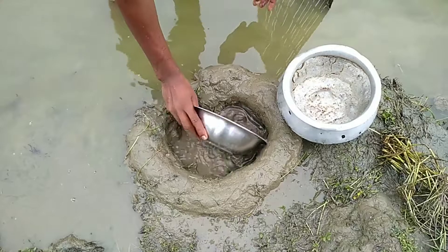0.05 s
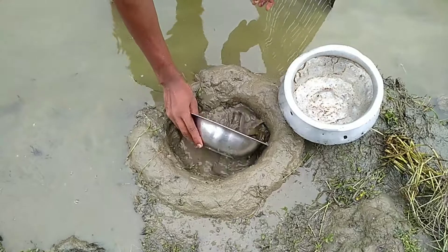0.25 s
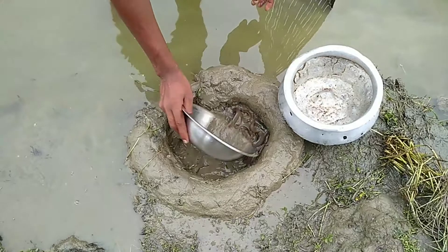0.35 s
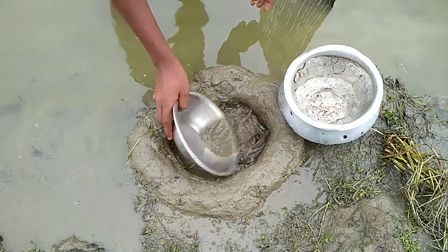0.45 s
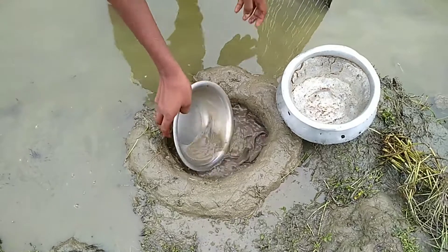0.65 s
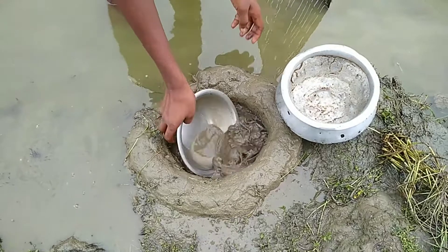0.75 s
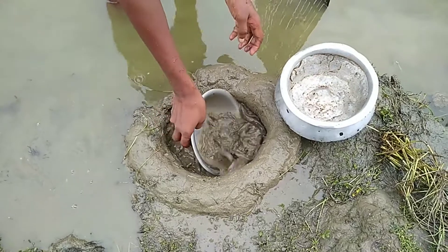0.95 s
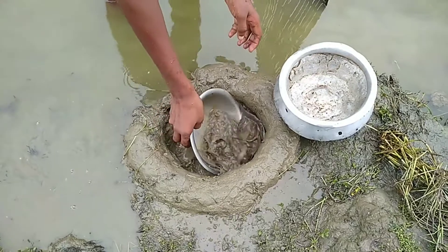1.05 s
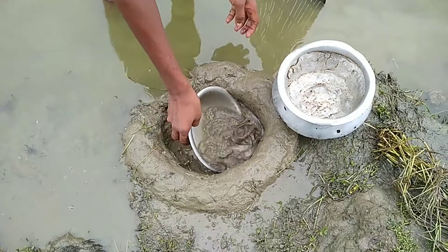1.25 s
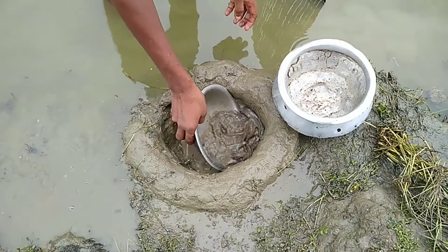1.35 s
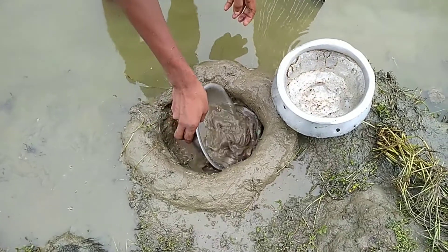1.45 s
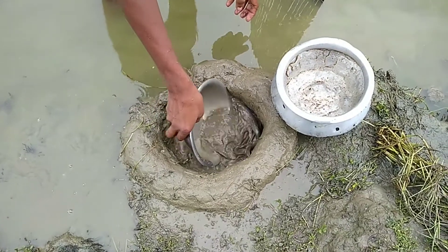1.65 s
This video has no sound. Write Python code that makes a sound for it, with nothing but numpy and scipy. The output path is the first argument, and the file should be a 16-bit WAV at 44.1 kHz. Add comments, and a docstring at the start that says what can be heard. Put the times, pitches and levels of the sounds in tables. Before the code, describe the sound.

A bowl scoops muddy water with wet splashes, spatter and bubbles, over light wind rumble and hiss

```python
"""After a short silence, wind rumbles in two microphone ports, over a faint river and a narrow, high hiss.
A steel bowl is tipped into a pit of muddy water: it splashes in, the water slops, spatters and bubbles.
Wind is low noise and wobbling tones; water is showers of clicks and damped tones; hiss is grainy noise.
The left port is bright and rings in the treble; the right one is muffled."""
import sys
import numpy as np
from scipy import signal
from scipy.fft import rfft, irfft
from scipy.io import wavfile
from scipy.ndimage import uniform_filter1d

SR = 44100
rng = np.random.default_rng(int(sys.argv[2]) if len(sys.argv) > 2 else 0)


def generate_wav(sig):
    """Save sig (samples, or channels by samples) to the path in sys.argv[1] as 16-bit PCM at SR."""
    pcm = np.round(np.clip(np.atleast_2d(sig).T, -1, 1) * 32767).astype(np.int16)
    wavfile.write(sys.argv[1], SR, pcm)


N = 74970


def undb(db):
    """Turn decibels into a gain."""
    return 10 ** (np.asarray(db) / 20)


def unit(x):
    """Scale to an average (rms) level of 1."""
    return x / np.sqrt(np.mean(x ** 2) + 1e-18)


def curve(rows, column=1):
    """Draw straight lines in dB between the table's points and return a gain for every sample."""
    rows = np.array(rows)
    return undb(np.interp(np.arange(N) / SR, rows[:, 0], rows[:, column]))


def colour(x, points):
    """Filter to the given (frequency [Hz], level [dB]) response without any sound before the input."""
    size = 2 * N
    hz, db = np.array(points).T
    log_hz = np.log(np.fft.rfftfreq(size, 1 / SR) + 1)
    gain = undb(np.interp(log_hz, np.log(hz), db))
    # Folding the cepstrum onto positive times gives the filter with the least delay.
    cepstrum = irfft(np.log(gain))
    cepstrum[1:N] *= 2
    cepstrum[N + 1:] = 0
    response = np.exp(rfft(cepstrum))
    return irfft(rfft(x, size) * response)[:N]


def steady(x, span_s):
    """Even out the loudness: hold the rms near 1 over spans of this length."""
    power = np.abs(uniform_filter1d(x ** 2, max(int(span_s * SR), 2)))
    return x / np.sqrt(power + 1e-3 * np.mean(x ** 2))


def noise(points):
    """Coloured noise of rms 1."""
    return unit(colour(rng.standard_normal(N), points))


def crackle(points, rate, scatter_db):
    """Many coloured clicks at random times, rate per second, of either sign and random size; rms 1."""
    sizes = undb(scatter_db * np.clip(rng.standard_normal(N), -2, 2))
    signs = rng.choice([-1, 1], N)
    present = rng.random(N) < rate / SR
    return unit(colour(sizes * signs * present, points))


def burst(start, attack, hold, decay):
    """A level that climbs in a straight line, holds, then dies away exponentially; all in seconds."""
    age = np.arange(N) / SR - start
    return np.clip(age / attack, 0, 1) * np.exp(-np.maximum(age - hold, 0) / decay)


# Wind buffets, one list for the left port and one for the right:
# (centre time [s], length [s], tone level [dB], pitch [Hz], flutter level [dB])
WIND_BUFFETS = [
    [(.153, 0.015, -32.5, 119.1, -39), (.19, 0.015, -38, 220, -46), (.218, 0.0057, -39.5, 300, -36),
     (.227, 0.016, -24, 75, -32), (.3, 0.036, -44.5, 54.3, -66), (.495, 0.044, -50, 130, -41),
     (.85, 0.055, -42, 80, -46), (.965, 0.028, -44, 90, -45.5), (1.128, 0.011, -37.5, 220.6, -38),
     (1.233, 0.0067, -36.5, 169.6, -40), (1.278, 0.01, -39, 91.8, -26), (1.307, 0.019, -28.5, 80.2, -39),
     (1.412, 0.015, -30, 99.97, -28), (1.46, 0.04, -56, 79.3, -39), (1.544, 0.02, -45.5, 91.6, -35),
     (1.6, 0.0058, -38, 200, -34.5), (1.65, 0.026, -44.5, 91.6, -49)],
    [(.09, 0.13, -53.5, 91.3, -45.5), (.42, 0.024, -30, 75.04, -35), (.465, 0.012, -29.5, 65.24, -38.5),
     (.524, 0.03, -26.5, 61.64, -49), (.575, 0.014, -35.5, 65, -39), (.645, 0.039, -30.5, 70.4, -43.5),
     (.703, 0.034, -32, 72, -29), (.75, 0.037, -36.5, 80, -36.5), (.79, 0.031, -30, 70, -34),
     (.917, 0.014, -31, 65, -37), (1.19, 0.014, -26, 60, -42), (1.237, 0.014, -29.5, 60, -37.5),
     (1.388, 0.024, -40.5, 96.5, -44.5)],
]
# Steady wind: (time [s], left level [dB], right level [dB])
STEADY_WIND = [(0, -86, -39), (.25, -52.5, -56.5), (.4, -68, -46.5), (.75, -63.5, -44.5), (.9, -60, -43.5),
               (1.08, -61, -47), (1.35, -62, -48.5), (1.7, -54, -57.5)]
# Colour of the wind noise: (frequency [Hz], level [dB])
RUMBLE_COLOUR = [(20, -24.5), (35, -13), (65, 1), (110, -3.5), (200, -11.5), (320, -19.5), (500, -36.5),
                 (800, -59.5), (2000, -70)]
BUFFET_WOBBLE = 0.19  # rms pitch wander, as a share of the pitch


def wind(buffets, bed):
    """Wind on one port: a low rumble, and eddies that each push it for a cycle or two and flutter."""
    t = np.arange(N) / SR
    flutter = steady(noise(RUMBLE_COLOUR), 0.0372)
    wobble = noise(RUMBLE_COLOUR)
    out = bed * steady(noise(RUMBLE_COLOUR), 0.044)
    for centre, length, db, hz, flutter_db in buffets:
        phase = hz * np.cumsum(1 + BUFFET_WOBBLE * wobble) / SR + rng.random()
        push = undb(db) * np.sqrt(2) * np.sin(2 * np.pi * phase)
        swell = np.exp(-2 * ((t - centre) / length) ** 2)
        out = out + swell * (push + undb(flutter_db) * flutter)
    return out


# Colour of the river: (frequency [Hz], level [dB])
RIVER_COLOUR = [(100, 23.5), (700, -2), (1300, 0), (3000, -10), (6000, -6), (15000, -31)]


def river():
    """The river's murmur on one port: quiet, steady noise, strongest in the bass."""
    return undb(-69.5) * noise(RIVER_COLOUR)


PATCHY_DB, PATCHY_PER_S = 5.5, 110  # rms size of the wander; inverse of its smoothing time


def patchy():
    """A gain that wanders quickly at random: smoothed noise read as decibels."""
    k = int(SR / PATCHY_PER_S)
    smooth = uniform_filter1d(rng.standard_normal(N), k)
    smooth = uniform_filter1d(smooth, k // 3 + 1)
    return undb(PATCHY_DB * unit(smooth))


# In cycles: time to fall to 1/e, time to swell. Glide: share the pitch rises per decay time.
BUBBLE_CYCLES, BUBBLE_RISE_CYCLES, BUBBLE_GLIDE = 5.8, 1.98, 0.027


def add_bubble(out, start, hz, db):
    """Add one bubble: a damped tone that swells in a few cycles and rises in pitch."""
    first = int(np.clip(start * SR, 0, N - 1))
    length = min(N - first, int(10 * BUBBLE_CYCLES * SR / hz))
    cycles = np.arange(length) * hz / SR
    swell = 1 - np.exp(-(cycles / BUBBLE_RISE_CYCLES) ** 2)
    shape = 2 * swell * np.exp(-cycles / BUBBLE_CYCLES)
    phase = cycles * (1 + .5 * BUBBLE_GLIDE * cycles / BUBBLE_CYCLES) + rng.random()
    out[first:first + length] += undb(db) * shape * np.sin(2 * np.pi * phase)


def swarm(rate, low_hz, high_hz):
    """Bubbles of random time, size and pitch, evened out to an rms near 1."""
    out = np.zeros(N)
    for when, pitch, size in rng.random((int(rate * N / SR), 3)):
        hz = low_hz * (high_hz / low_hz) ** pitch
        db = 8 * min(-np.log(size), 2)  # many small bubbles, few large ones
        add_bubble(out, when * N / SR, hz, db)
    return steady(out, 0.084)


# Sloshing: (time [s], churning level [dB], fine spray level [dB])
SLOSH_LEVELS = [(0, -33.5, -28), (.64, -37, -23.5), (.69, -30.5, -31), (.77, -23, -20), (.795, 4, 8),
                (.85, -9.5, -9), (.93, 2, 4.5), (.98, -5.5, -20), (1.03, -1.5, -8), (1.07, -9.5, -19.5),
                (1.17, -5, 3.5), (1.25, -8, -22), (1.345, -18, -20), (1.39, -9, -11), (1.5, -15, -26),
                (1.58, -17.5, -18), (1.66, -12.5, -14.5), (1.7, -28.5, -28)]
# Colours of the water's low body, its ring and its bright spray: (frequency [Hz], level [dB])
BODY_COLOUR = [(200, -18.5), (550, -12), (800, -10.5), (1250, 4), (1800, -7), (2500, 6.5), (3400, 6),
               (5000, -9), (9000, -61)]
RING_COLOUR = [(1000, -43), (2600, -25), (3500, -8.5), (4300, 3.5), (4850, 3.5), (5300, -8.5), (5900, -8),
               (7000, -2.5), (10000, -38)]
SPRAY_COLOUR = [(2000, -33), (5500, -27.5), (7200, -11), (8500, 0.5), (9600, 3), (10700, -1.5), (12000, -8),
                (13500, -8.5), (15500, -22)]


def spatter(points, db):
    """Patchy droplet clicks of even size, in one colour."""
    return undb(db) * patchy() * steady(crackle(points, 900, 0), 0.017)


def slosh():
    """Moving water: patchy spatter, with low gurgles, froth and fizz from bubbles of falling size."""
    # Levels here are relative to the sloshing curves.
    body = spatter(BODY_COLOUR, -50.5)
    ring = spatter(RING_COLOUR, -46)
    spray = spatter(SPRAY_COLOUR, -43)
    # Swarms: bubbles per second, lowest and highest pitch in Hz
    gurgle = undb(-61) * swarm(120, 323, 969)
    froth = undb(-48) * swarm(520, 1284, 5170)
    fizz = undb(-42.5) * swarm(260, 7580, 11440)
    churning = curve(SLOSH_LEVELS, column=1) * (body + ring + gurgle + froth)
    return churning + curve(SLOSH_LEVELS, column=2) * (spray + fizz)


# Bursts of the narrow hiss: (start time [s], hold [s], level [dB])
HISS_BURSTS = [(0.058, 0.04, -38.5), (0.18, 0.067, -42), (0.401, 0.049, -38.5), (0.517, 0.025, -45),
               (.654, 0.078, -40.5), (0.819, .2, -37), (1.057, 0.074, -44), (1.185, 0.059, -38.5),
               (1.391, 0.038, -42.5), (1.441, 0.18, -40)]
# Colour of the hiss: (frequency [Hz], level [dB])
HISS_COLOUR = [(1000, -36.5), (3400, -49), (4400, -36), (5400, -20), (6400, -20), (7400, -12), (8200, -3),
               (8900, 3.5), (9350, -0.5), (9750, -13.5), (10700, -22), (12000, -50.5), (15500, -36.5)]
HISS_ATTACK_S, HISS_DECAY_S, HISS_FLOOR_DB, HISS_GRAINS_PER_S = 0.0056, 0.035, -54.5, 2500


def hiss():
    """Narrow, grainy hiss: random clicks whose bursts start abruptly, hold and fade to a quiet floor."""
    power = undb(HISS_FLOOR_DB) ** 2
    for start, hold, db in HISS_BURSTS:
        power = power + (undb(db) * burst(start, HISS_ATTACK_S, hold, HISS_DECAY_S)) ** 2
    return np.sqrt(power) * steady(crackle(HISS_COLOUR, HISS_GRAINS_PER_S, 1.5), 0.12)


# Splashes: (start time [s], hold [s], decay [s], body level [dB], ring level [dB], spray level [dB])
SPLASH_EVENTS = [(0.06, .003, 0.011, -47.5, -66, -72), (.186, 0.0033, .004, -63, -55, -40.5),
                 (0.233, 0.03, 0.027, -92.5, -58, -59), (0.385, .003, .012, -91, -53, -57),
                 (0.403, 0.0033, .006, -96, -56, -59), (0.682, 0.019, 0.01, -60.5, -56, -48.5),
                 (0.778, 0.013, 0.0031, -38.5, -24, -20.5), (0.786, 0.0051, 0.014, -25.5, -27.5, -28),
                 (0.868, 0.0038, 0.0036, -42.5, -33, -23), (0.936, 0.0025, 0.0031, -38, -44, -33.5),
                 (.945, 0.013, 0.0048, -43, -40, -30.5), (1.009, 0.0014, 0.0016, -34, -31, -30),
                 (1.058, 0.0025, 0.0039, -47, -45, -37), (1.097, 0.0022, 0.015, -42.5, -47, -26),
                 (1.1502, 0.0025, 0.0026, -32, -19, -8), (1.173, 0.01, 0.0039, -44, -39.5, -33),
                 (1.206, 0.003, 0.0016, -49, -61, -23.5), (1.228, 0.0052, .008, -58, -39.5, -30),
                 (1.278, 0.0026, 0.003, -59, -66, -36.5), (1.3, 0.0086, 0.0054, -67, -70, -74),
                 (1.364, 0.02, 0.0067, -72, -49, -34.5), (1.419, 0.0013, 0.0032, -47, -41, -46),
                 (1.451, 0.0015, .002, -63, -31.5, -28), (1.53, 0.0025, 0.0036, -65, -40.5, -31.5)]
SPLASH_ATTACK_S, CLICKS_PER_S, CLICK_SCATTER_DB = .0005, 5000, 2.5


def shower(points):
    """A dense, even shower of droplet clicks in one colour."""
    return steady(crackle(points, CLICKS_PER_S, CLICK_SCATTER_DB), 0.0077)


def splashes():
    """Each splash is a dense shower of droplet clicks with a low body, a ring and bright spray."""
    body, ring, spray = shower(BODY_COLOUR), shower(RING_COLOUR), shower(SPRAY_COLOUR)
    out = np.zeros(N)
    for start, hold, decay, body_db, ring_db, spray_db in SPLASH_EVENTS:
        drops = undb(body_db) * body + undb(ring_db) * ring + undb(spray_db) * spray
        out += burst(start, SPLASH_ATTACK_S, hold, decay) * drops
    return out


# Single bubbles and drips: (start time [s], pitch [Hz], level [dB])
BUBBLE_EVENTS = [(0.257, 4350, -37.5), (0.388, 4740, -42), (0.529, 5080, -41), (.698, 4070, -34.5),
                 (0.712, 3860, -38), (.79, 1062, -31), (.793, 1355, -26), (.794, 750, -41.5),
                 (0.887, 1150, -42.5), (0.903, 4070, -29), (.912, 1283, -39), (0.932, 1330, -29),
                 (0.933, 1497, -29.5), (0.937, 2990, -30), (0.943, 4150, -24.5), (0.958, 2410, -38),
                 (0.956, 1570, -50), (.998, 1430, -40.5), (1.01, 4200, -23), (1.01, 1212, -30),
                 (1.022, 996, -46), (1.025, 2930, -31), (1.029, 1090, -33.5), (1.034, 870, -40.5),
                 (1.077, 1040, -43.5), (1.088, 1000, -40), (1.092, 4400, -34), (1.109, 3900, -25),
                 (1.123, 2520, -40.5), (1.183, 983, -40.5), (1.208, 1466, -38.5), (1.22, 1335, -50),
                 (1.232, 3450, -38), (1.24, 1393, -44), (1.248, 2490, -38.5), (1.268, 1460, -49),
                 (1.308, 530, -56), (.97, 543, -57), (1.38, 1260, -49.5), (1.405, 2110, -49),
                 (1.47, 1640, -53), (1.652, 2470, -45.5), (1.25, 674, -55), (1.285, 750, -54),
                 (1.301, 1457, -42), (1.304, 1056, -51.5), (1.336, 1270, -49), (1.38, 2120, -40),
                 (1.417, 4310, -32), (1.418, 3190, -31.5), (1.427, 2230, -38.5), (1.453, 3960, -29.5),
                 (1.573, 1098, -44), (1.574, 3220, -36), (1.585, 3990, -28), (1.626, 3290, -35.5),
                 (1.644, 1070, -48), (1.664, 2750, -35.5)]
# Smaller bubbles around each listed one: relative level, spread in time and in pitch
SATELLITE_DB, SATELLITE_SPREAD_S, SATELLITE_SPREAD_OCTAVES = -12, .007, 0.168


def bubbles(count=4):
    """Pockets of air that close in the mud and ring briefly, each with a few smaller ones of nearby pitch."""
    out = np.zeros(N)
    for start, hz, db in BUBBLE_EVENTS:
        add_bubble(out, start, hz, db)
        for late, detune, size in rng.standard_normal((count, 3)):
            when = start + SATELLITE_SPREAD_S * (late + .5)
            pitch = hz * 2 ** (SATELLITE_SPREAD_OCTAVES * detune)
            add_bubble(out, when, pitch, db + SATELLITE_DB + 2 * size)
    return out


def pit(x):
    """Short scatter from the bowl and the mud walls: a fading burst of random echoes."""
    t = np.arange(SR // 10) / SR
    tail = rng.standard_normal(len(t)) * np.exp(-t / 0.011)  # decay in seconds
    tail = tail / np.sqrt(np.sum(tail ** 2))
    return x + undb(-13) * signal.fftconvolve(x, tail)[:N]


def water():
    """One random version of the splashes, hiss and slosh together."""
    return splashes() + hiss() + slosh()


# How the right port dulls the sound: (frequency [Hz], level [dB])
RIGHT_PORT_COLOUR = [(300, 0.5), (1400, -2.5), (2400, -1.5), (3200, -9.5), (4400, -17), (6000, -14.5),
                     (8400, -29.5), (9900, -38), (12000, -28.5), (15000, -17)]
STRAY_DB = 0.5  # water and hiss heard by one port only, relative to the shared part


def scene():
    """Both ports share bubbles and part of the water and hiss; the rest, wind and river are their own."""
    left_wind = wind(WIND_BUFFETS[0], curve(STEADY_WIND, column=1))
    right_wind = wind(WIND_BUFFETS[1], curve(STEADY_WIND, column=2))
    shared, drips, stray = water(), bubbles(), undb(STRAY_DB)
    # Dividing by hypot keeps the total power when the two parts are mixed.
    left = pit(drips + (shared + stray * water()) / np.hypot(1, stray))
    right = pit(drips + (shared + stray * water()) / np.hypot(1, stray))
    right = colour(right, RIGHT_PORT_COLOUR)
    return np.array([left + left_wind + river(), right + right_wind + river()])


START_S, OPENING_S = .06, 0.0011
CEILING, TOP_HZ = 0.68, 15700


def record(dry):
    """The sound opens after a moment of silence; peaks are capped and then the top is cut."""
    opening = np.clip((np.arange(N) / SR - START_S) / OPENING_S, 0, 1)
    capped = np.clip(dry * opening, -CEILING, CEILING)
    low_pass = signal.ellip(8, .2, 70, TOP_HZ, fs=SR, output="sos")
    return signal.sosfilt(low_pass, capped)


dry = scene()
out = record(dry)
generate_wav(out)
```